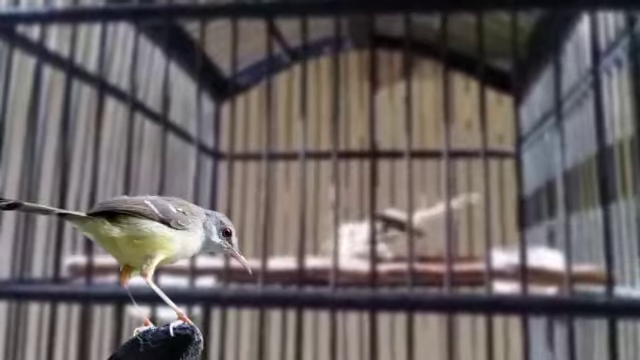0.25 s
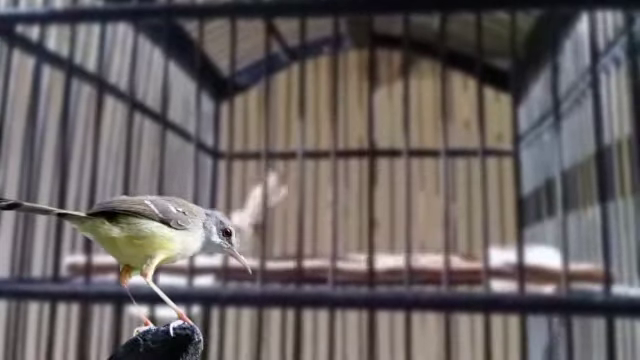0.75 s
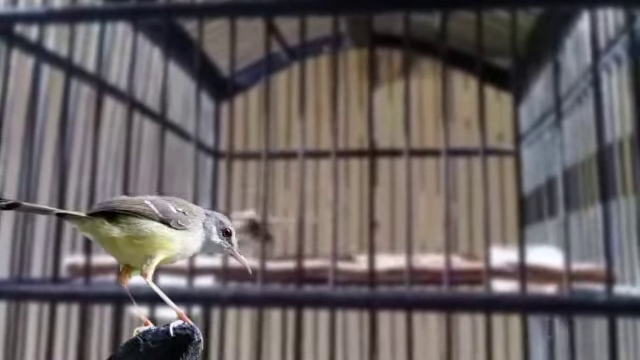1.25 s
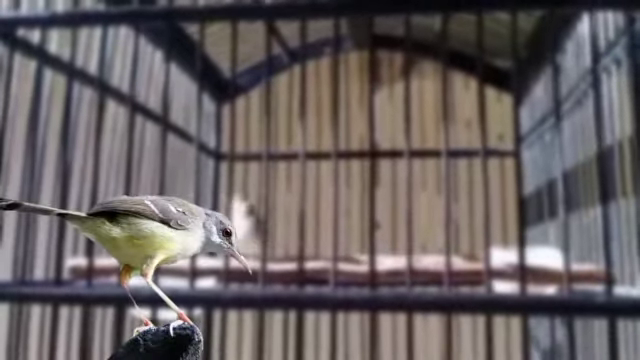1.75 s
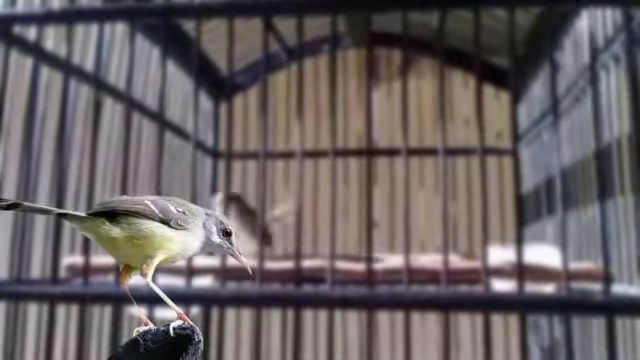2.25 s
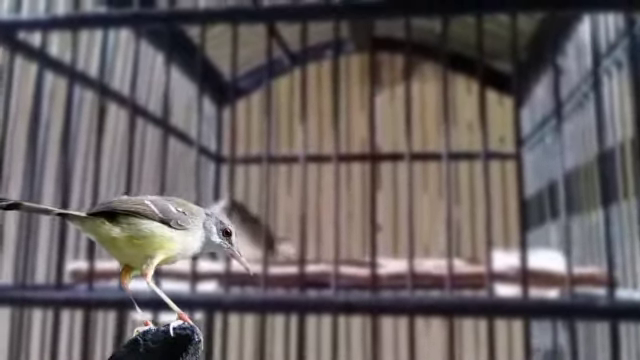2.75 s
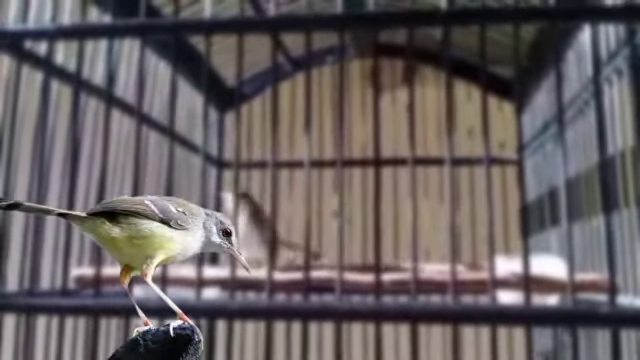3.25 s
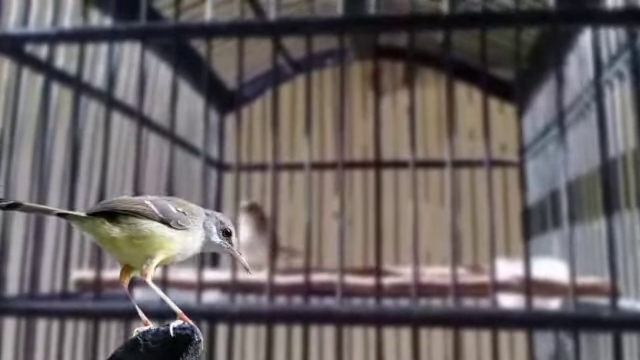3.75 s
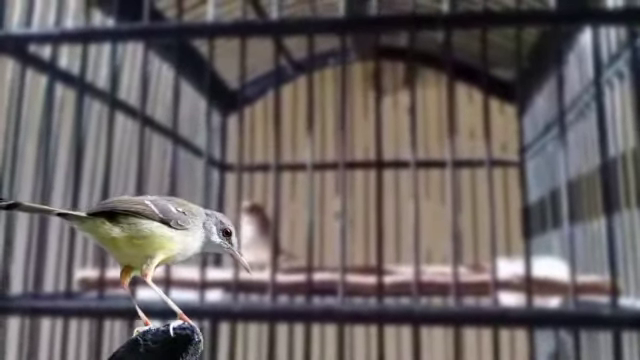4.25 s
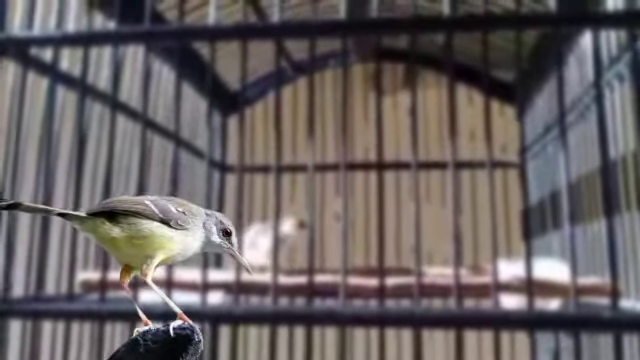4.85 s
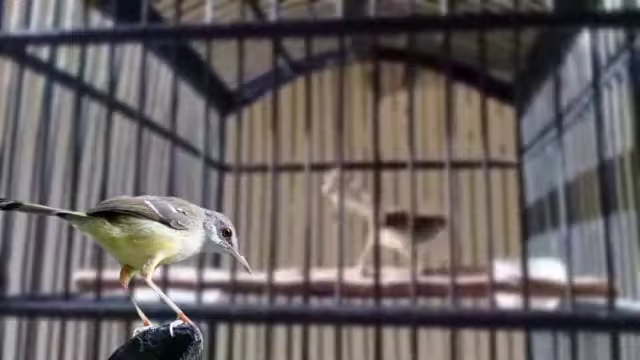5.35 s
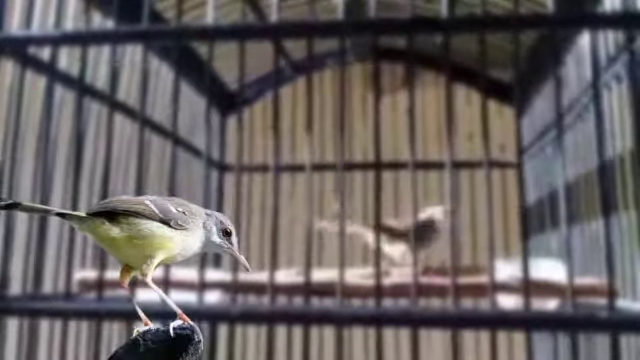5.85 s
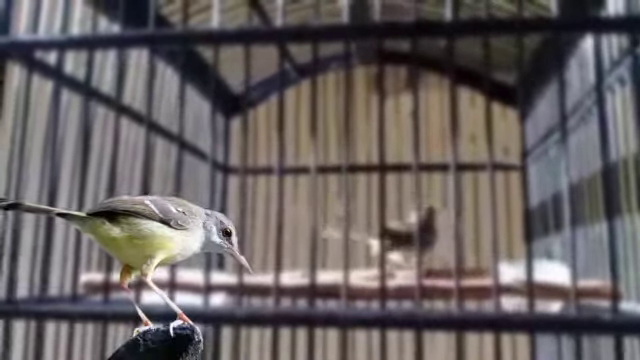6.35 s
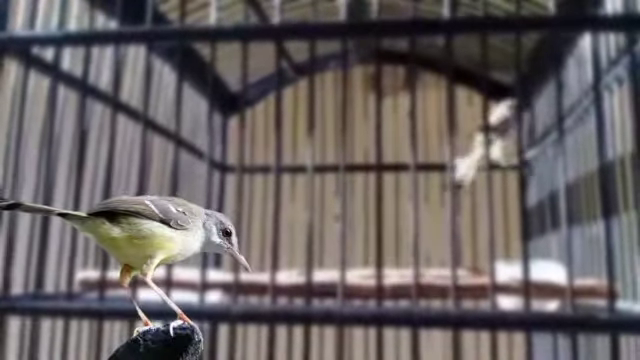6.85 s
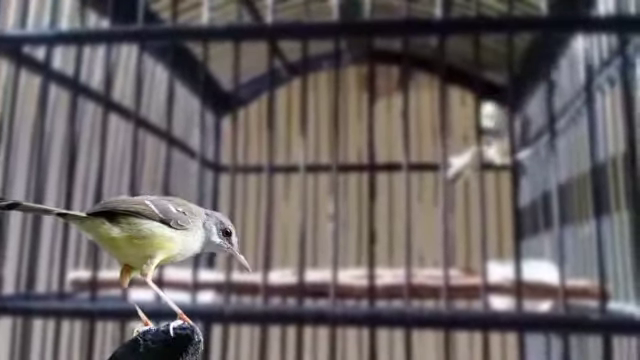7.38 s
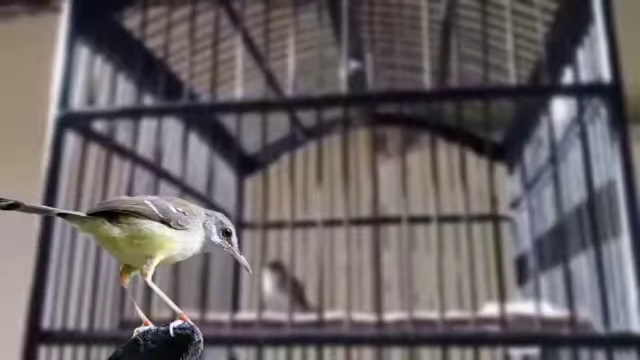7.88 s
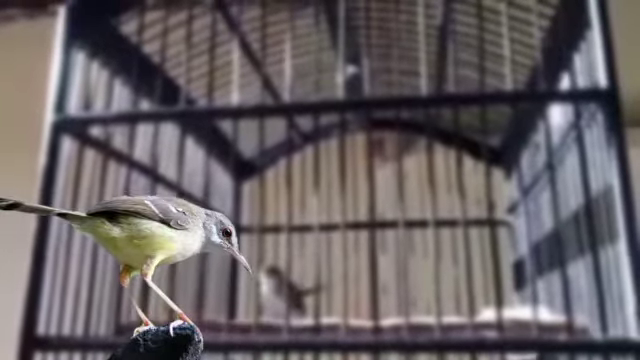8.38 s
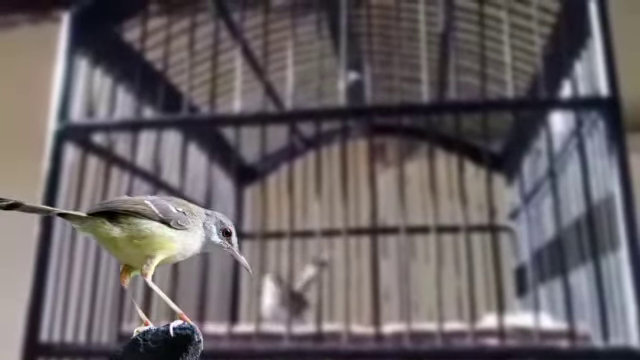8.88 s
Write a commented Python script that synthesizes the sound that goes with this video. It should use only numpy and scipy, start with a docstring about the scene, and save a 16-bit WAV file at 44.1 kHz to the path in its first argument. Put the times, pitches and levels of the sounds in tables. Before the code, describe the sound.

Inside a small room, fainter birds whistle before a nearby caged bird gives a scratchy two-toned call. It chirps regularly, each high note rising and dropping quickly after a tiny tick, until a sharp cage rap and a blink of silence. Sliding, buzzing calls come next, then soft thumps, a few chirps and a last knock. Loud notes flatten slightly over low rumble and hiss.

```python
"""A bar-winged prinia sings in a cage in a small room, close enough to overload the microphone.
Fainter birds whistle from the start; a harsh two-voiced call comes first, a glide broken by chaotic rasps.
Ticks (steep sweeps) lead a run of arched chirps; a hard cage knock (crack and ringing modes) ends it.
The sound drops out briefly; falling slurs and buzzes (period-doubled tones) follow, then knocks.
More chirps and a last knock close it, over rumble, wash, hiss (shaped noise) and a low drone."""
import sys
import numpy as np
from scipy import signal
from scipy.fft import rfft, irfft
from scipy.io import wavfile

SR = 44100
rng = np.random.default_rng(int(sys.argv[2]) if len(sys.argv) > 2 else 0)


def transcribe(u):
    """Save the signal u as a 16-bit wav file named by the first command-line argument.

    u: samples, shape (n,) or (channels, n), limited to [-1, 1]; the rate is SR.
    q: integer samples, one column per channel.
    """
    v = np.clip(np.atleast_2d(u).T, -1, 1)
    q = np.round(v * 32767).astype(np.int16)
    wavfile.write(sys.argv[1], SR, q)


N = 402191
TIME = np.arange(N) / SR

# no note is quite steady: spread as a share of pitch, spread of level, rate
WAVER, WAVER_DB, WAVER_HZ = 0.0081, 2.48, 53.2


def sing(notes, partials, jitter, shimmer_db, flutter_hz, edge_s):
    """Frequency modulation: phase integrates a trembling pitch; partials lock to quarters of that phase."""
    out = np.zeros(N)
    effort = flutter(WAVER_HZ)  # moves pitch and level together
    bend = 1 + jitter * flutter(flutter_hz) + WAVER * effort
    tremble = from_db(shimmer_db * flutter(flutter_hz) + WAVER_DB * effort)
    for note in notes:
        s, hz, db = np.transpose(sorted(note))
        at = slice(*np.searchsorted(TIME, [s[0] - edge_s, s[-1] + edge_s]))
        t = TIME[at]
        phase = 2 * np.pi * np.cumsum(np.interp(t, s, hz) * bend[at]) / SR
        inside = np.minimum(t - s[0], s[-1] - t)
        gate = np.sin(np.pi / 2 * np.clip(1 + inside / edge_s, 0, 1)) ** 2
        tone = sum(from_db(level) * np.sin(round(4 * k) / 4 * phase) for k, level in partials)
        out[at] += gate * from_db(np.interp(t, s, db)) * tremble[at] * tone
    return out


def glide(start_s, length_s, pitches_hz, levels_db, count=25):
    """Polynomial pitch contour through evenly spaced values, piecewise-linear level: rows (t/s, f/Hz, level/dB)."""
    u = np.linspace(0, 1, count)
    pitch_at = np.linspace(0, 1, len(pitches_hz))
    bend = np.polyfit(pitch_at, pitches_hz, len(pitches_hz) - 1)
    db = np.interp(u, np.linspace(0, 1, len(levels_db)), levels_db)
    return list(zip(start_s + length_s * u, np.polyval(bend, u), db))


LEAD_IN_S, LEAD_IN_HZ, LEAD_IN_SWELL_DB = .021, 1980, 4  # slides in softly from below, swelling
ATTACK_S = .006  # then rises to full strength
KNEE_SHARE, KNEE_DB = .4, -2.5  # the climb changes pace at this share of the rise
CREST_SHARE, CREST_SAG_HZ = 0.25, 167.4  # the top is rounded
FOOT_HZ, FOOT_DB = 3366, -4.5  # where the loud fall ends
RELEASE_S, RELEASE_HZ, RELEASE_DB = .016, 2827, -25.5


def arch(s, rise_s, fall_s, onset_hz, knee_hz, top_hz, lead_db, rise_db, crest_db, fall_db):
    """Piecewise-linear chirp: soft lead-in, burst, climb past a knee, rounded crest, fall and release."""
    top_s, crest_hz = s + rise_s, top_hz - CREST_SAG_HZ
    foot_s = top_s + fall_s
    attack_hz = np.interp(ATTACK_S, [0, LEAD_IN_S], [onset_hz, LEAD_IN_HZ])
    lead_in = [(s - LEAD_IN_S, LEAD_IN_HZ, lead_db - LEAD_IN_SWELL_DB / 2),
               (s - ATTACK_S, attack_hz, lead_db + LEAD_IN_SWELL_DB / 2)]
    climb = [(s, onset_hz, rise_db), (s + KNEE_SHARE * rise_s, knee_hz, rise_db + KNEE_DB)]
    crest = [(top_s - CREST_SHARE * rise_s, crest_hz, crest_db),
             (top_s, top_hz, crest_db),
             (top_s + CREST_SHARE * fall_s, crest_hz, fall_db)]
    drop = [(foot_s, FOOT_HZ, fall_db + FOOT_DB), (foot_s + RELEASE_S, RELEASE_HZ, RELEASE_DB)]
    return lead_in + climb + crest + drop


SLUR_ATTACK_S, SLUR_ATTACK_DB, SLUR_OVERSHOOT_HZ = .013, -20.5, 251.3


def slur(row):
    """Downward frequency sweep, swelling in from just above its first pitch."""
    s, length, *pitches, first_db, middle_db, last_db = row
    swell = (s - SLUR_ATTACK_S, pitches[0] + SLUR_OVERSHOOT_HZ, first_db + SLUR_ATTACK_DB)
    return [swell] + glide(s, length, pitches, (first_db, middle_db, last_db))


def trails(notes):
    """Falling pitch of a relaxing syrinx: each note trails off far down in pitch."""
    ends = [max(note)[0] for note in notes]
    falls = [[(s - .012, 2900, -24), (s + 0.0014, 2200, -28), (s + 0.0199, 1500, -38)] for s in ends]
    return sing(falls, [(1, 0.017)], jitter=0.06, shimmer_db=0.5, flutter_hz=400, edge_s=.004)


# Levels of notes are relative throughout.
# arched chirps: onset t/s, rise t/s, fall t/s, onset f/Hz, knee f/Hz, top f/Hz,
# lead-in level/dB, rise level/dB, crest level/dB, fall level/dB
ARCHES = [(1.267, .048, .022, 3050, 4030, 4695, -12.5, 0, -12.5, -5),
          (1.593, .029, 0.028, 3440, 3710, 4660, -16, 0, -12, -1),
          (1.873, 0.057, 0.027, 3257, 3890, 4510, -23.5, 0.5, -8.5, -1),
          (2.165, 0.051, 0.026, 3180, 3834, 4786, -27, 0, -6, -7),
          (2.451, 0.043, 0.031, 3330, 3840, 4760, -24, 0, -7.5, -2.5),
          (2.757, .030, 0.018, 3333, 3840, 4426, -25.5, -4.5, -4.5, -9),
          (3.015, 0.054, 0.025, 3477, 3826, 4790, -16.5, -0.5, -7, -9),
          (3.306, 0.042, .022, 3150, 3560, 4650, -26, -3.5, -1.5, -10),
          (3.570, 0.041, .033, 3350, 3700, 4860, -20.5, -4, 1, -8),
          (3.846, .040, .020, 3320, 4025, 4630, -17, -1.5, -3.5, -13.5),
          (4.124, .041, 0.019, 3380, 4050, 5090, -17, 0.5, -15, -2),
          (8.092, 0.045, .026, 3194, 3707, 4913, -26, -1, -12.5, -2.5),
          (8.393, 0.041, 0.022, 3120, 3954, 4450, -24.5, -3, -7.5, -6),
          (8.690, 0.046, 0.013, 3310, 3790, 4670, -25, -2, -13.5, -6)]
# falling slurs: start t/s, length t/s, f/Hz at start, each quarter and end (5 columns),
# level/dB at start, middle and end (3 columns)
SLURS = [(4.703, 0.1, 6330, 5510, 5080, 4006, 3150, -7.5, -6.5, -3.5),
         (4.947, 0.12, 6440, 5180, 4490, 4265, 3315, -7, -3.5, -9.5),
         (6.551, .108, 4870, 4350, 4060, 3613, 2965, -5.5, -1.5, -4),
         (6.875, 0.12, 5490, 4505, 4007, 3654, 3160, -5.5, -6.5, -7.5)]
# flicks of the other side of the syrinx: start t/s, length t/s, f/Hz at start, middle and end, level/dB
FLICKS = [(1.307, 0.037, 6400, 5410, 4240, -14.5), (2.14, 0.017, 2670, 3280, 3150, -5),
          (3.05, .035, 4600, 5180, 4460, -17), (3.281, .026, 2700, 3200, 3080, -7),
          (4.163, .020, 5300, 4784, 3670, -0.5), (5.413, 0.02, 2960, 4470, 7300, -11.5),
          (5.427, 0.015, 3004, 4220, 3150, 3), (6.068, 0.013, 5310, 7130, 4700, -12),
          (6.071, 0.0125, 2788, 3490, 2830, -6), (7.506, 0.032, 3450, 4193, 4710, 0),
          (7.522, .028, 4700, 3620, 3300, -7.5), (7.683, 0.0162, 4360, 3900, 2980, -14)]
# nearly pure spectrum: multiple of the pitch [ratio], level/dB
CLEAR_PARTIALS = [(.5, -42), (1, 0), (1.5, -44), (2, -42)]
FLICK_EDGE_DB = -19  # a flick swells from and fades to this, relative to its middle


def clear_notes():
    """Near-sinusoidal phonation: arched chirps, slurs and quick flicks with weak partials."""
    notes = [arch(*row) for row in ARCHES] + [slur(row) for row in SLURS]
    flicks = []
    for s, length, *pitches, db in FLICKS:
        edge_db = db + FLICK_EDGE_DB
        flicks.append(glide(s, length, pitches, (edge_db, db, edge_db)))
    clear = sing(notes + flicks, CLEAR_PARTIALS, jitter=0.0014, shimmer_db=2.5, flutter_hz=362, edge_s=0.0064)
    return from_db(-0.08) * clear + trails(notes)


# buzzy slurs: start t/s, length t/s, strong-line f/Hz at start, each quarter and end (5 columns),
# level/dB at start, middle and end (3 columns)
BUZZES = [(5.44, .095, 4870, 4537, 4000, 3520, 3120, -14.5, -7.5, -15.5),
          (6.067, .152, 4970, 4900, 4375, 4010, 3170, -8, -6, -11.5),
          (7.552, .172, 4953, 4313, 4062, 3647, 3065, -7, -7.5, -16.5)]
# spectrum with half-pitch lines: multiple of the pitch [ratio], level/dB
BUZZY_PARTIALS = [(.5, -12.5), (1, 4.5), (1.5, -26.5), (2, -24.5), (2.5, -31)]


def buzzes():
    """Period doubling: half-pitch partials make every second cycle differ."""
    notes = [slur(row) for row in BUZZES]
    buzzy = sing(notes, BUZZY_PARTIALS, jitter=0.018, shimmer_db=1.0, flutter_hz=523, edge_s=0.0037)
    return from_db(-3.06) * buzzy


# opening harsh call: t/s, f/Hz, level/dB
HARSH_CALL = [(0.572, 4358, -22), (0.584, 4130, -5), (0.602, 4075, -25), (0.62, 4750, -15),
              (0.658, 4829, -21), (0.67, 4310, -8), (0.678, 4370, -13), (0.692, 3535, -16.5),
              (0.75, 3950, -29.5)]
# second side of the syrinx, braiding round it: t/s, f/Hz, level/dB
SECOND_VOICE = [(0.577, 6594, -23), (.598, 3500, -21), (0.614, 3210, -24), (0.631, 3720, -45),
                (0.678, 3230, -19.5), (.755, 2980, -28.5)]
# its spectrum: multiple of the pitch [ratio], level/dB
HARSH_PARTIALS = [(.5, -9.5), (1, 3), (1.5, -25)]
RATTLE_DEPTH = .7


def harsh_call():
    """Biphonation with amplitude modulation: two pitch lines share a rattle wandering about 260 Hz."""
    voices = sing([HARSH_CALL, SECOND_VOICE], HARSH_PARTIALS,
                  jitter=.02, shimmer_db=1.5, flutter_hz=216, edge_s=0.0026)
    rattle_phase = 2 * np.pi * np.cumsum(260 + 60 * flutter(47.3)) / SR
    return from_db(-0.5) * voices * (1 + RATTLE_DEPTH * np.sin(rattle_phase))


# rasps: start t/s, length t/s, level/dB
RASPS = [(0.59, 0.044, -5), (0.625, 0.054, -12), (0.694, 0.041, -13), (5.412, 0.021, -3),
         (6.064, 0.021, -0.5), (6.527, 0.017, -10), (7.517, 0.0282, -5), (7.697, .014, -27),
         (8.634, 0.03, -2.5)]


def rasps():
    """Chaotic phonation: strong fast random pitch and level modulation breaks a falling tone into noise."""
    breaks = [[(s, 4600, db), (s + length, 4000, db - 9)] for s, length, db in RASPS]
    rough = sing(breaks, [(.5, -23), (1, -2), (1.5, -17.0)],
                 jitter=0.121, shimmer_db=7.0, flutter_hz=590, edge_s=.003)
    return from_db(-7.0) * band(rough, 1670, 10200)


# ticks: start t/s, length t/s, level/dB
TICKS = [(0.568, 0.013, -9), (0.923, 0.029, -23), (0.997, 0.016, -22.5), (1.061, 0.03, -20),
         (1.119, 0.021, -20), (1.196, 0.023, -20), (1.221, 0.012, -6), (1.482, 0.013, -22.5),
         (1.532, 0.018, -13), (1.826, 0.0094, -10), (2.116, 0.02, -14), (2.4, 0.015, -10.5),
         (2.707, 0.019, -8.5), (2.952, 0.021, -5.5), (3.245, 0.011, -5), (3.526, 0.014, -1),
         (3.779, 0.0086, -4.5), (4.065, 0.021, -7.5), (8.048, 0.016, -15), (8.334, 0.041, -14),
         (8.634, 0.012, -22), (8.638, 0.008, -8)]


def ticks():
    """Rapid frequency sweep: a steep fall through a band-pass is heard as a tick."""
    sweeps = [[(s, 7000, db + 2.5), (s + length / 2, 5700, db), (s + length, 3700, db)]
              for s, length, db in TICKS]
    tick = sing(sweeps, [(.5, -11.0), (1, -3.5)],
                jitter=0.065, shimmer_db=3.0, flutter_hz=840, edge_s=0.0013)
    return from_db(-6.5) * band(tick, 3090, 5280)


def prinia():
    """Superposition of the syrinx regimes: clear, harsh, period-doubled and chaotic notes, and ticks."""
    return clear_notes() + harsh_call() + buzzes() + rasps() + ticks()


# knocks: t/s, peak level/dB before the room, upper band edge f/Hz
KNOCKS = [(2.03, -45, 3000), (4.4473, -9, 6400), (4.505, -26.5, 453), (4.515, -27.5, 640),
          (7.747, -25, 1500), (7.756, -23, 1510), (9.018, -28, 2930)]
# modes of the frame: f/Hz, relative level/dB, 60 dB decay t/s
CAGE_MODES = [(294, -30, 0.21), (518, -21.5, 0.085), (724, -36.5, 0.26), (1143, -32, .07), (1910, -43, .05),
              (2440, 0.5, 0.12)]


def cage():
    """Modal excitation: a short crack and decaying frame modes; a lower band edge makes a duller knock."""
    t = TIME[:SR // 4]
    ring = sum(from_db(db - 60 * t / t60) * np.sin(2 * np.pi * hz * t) for hz, db, t60 in CAGE_MODES)
    burst = np.sin(2 * np.pi * 700 * t) + 0.87 * rng.standard_normal(len(t))
    crack = from_db(-60 * t / 0.0063) * burst
    out = np.zeros(N + len(t))
    for s, db, bright_hz in KNOCKS:
        knock = band(crack + from_db(-26.5) * ring, 120, bright_hz)
        out[int(s * SR):][:len(t)] += from_db(db) * knock / np.abs(knock).max()
    return out[:N]


# whistles behind: start t/s, length t/s, f/Hz at start, middle and end, first level/dB, last level/dB
WHISTLES = [(.07, 0.11, 5300, 4186, 3820, -35, -29), (0.312, 0.16, 7200, 4770, 3900, -31, -25),
            (0.774, 0.07, 3905, 3726, 3700, -24, -31.5), (2.31, 0.16, 4000, 6360, 6850, -45.5, -23.5),
            (3.398, 0.13, 2100, 2590, 2940, -31.5, -34.5), (3.87, 0.19, 2320, 2365, 2450, -33, -40),
            (4.242, .18, 3020, 3065, 3100, -37, -41.5), (4.51, 0.026, 6620, 6220, 5900, -34, -28.5),
            (4.634, 0.15, 2930, 2920, 2970, -23, -29), (4.635, 0.05, 5200, 4080, 3400, -29.5, -29.5),
            (4.889, 0.077, 7000, 5350, 3200, -46, -22), (4.93, 0.2, 2520, 2255, 2190, -26.5, -40),
            (3.108, 0.15, 3020, 2870, 2770, -41, -40), (5.181, 0.15, 2430, 3900, 4080, -30, -40),
            (5.214, .195, 7100, 6180, 4180, -38.5, -32.5), (5.32, 0.084, 3050, 2800, 2770, -36.5, -26.5),
            (5.50, 0.22, 7150, 6290, 3510, -44, -29), (5.81, .195, 7000, 6070, 3300, -32, -24),
            (6.28, 0.18, 2900, 4690, 5150, -33, -27), (6.97, 0.087, 6850, 6880, 6740, -36, -53),
            (7.111, 0.17, 4200, 6570, 6830, -39.5, -30), (7.32, 0.21, 3300, 3395, 3490, -30.5, -22),
            (7.74, 0.23, 3475, 3376, 3340, -31, -46), (7.97, 0.094, 3500, 4880, 6250, -34.5, -30),
            (8.165, 0.07, 6250, 5970, 6150, -36, -58), (8.261, 0.069, 3900, 5270, 6350, -30.5, -37.5),
            (8.525, 0.087, 4180, 5850, 6200, -29, -43), (8.805, 0.069, 6760, 6300, 5500, -49, -53),
            (8.88, 0.11, 5100, 4100, 3820, -31, -29)]


def whistles():
    """Smooth frequency glides with a second harmonic confined to a narrow bright band."""
    notes = [glide(s, length, pitches, (first_db, last_db))
             for s, length, *pitches, first_db, last_db in WHISTLES]
    whistle = sing(notes, [(1, 0.0)], jitter=.005, shimmer_db=2.5, flutter_hz=288, edge_s=0.012)
    overtone = sing(notes, [(2, -11.5)], jitter=.005, shimmer_db=4.5, flutter_hz=300, edge_s=0.0081)
    return whistle + band(overtone, 7750, 9150)


# trills behind: start t/s, length t/s, pip rate f/Hz, top f/Hz, level/dB
TRILLS = [(2.6, .088, 23.7, 3850, -33), (7.311, .165, 24, 3770, -26.5), (7.77, .175, 18, 3280, -30)]


def trills():
    """Periodic repetition: short upward pips follow one another at a steady rate."""
    pips = []
    for start, length, rate, hz, db in TRILLS:
        for s in np.arange(start, start + length, 1 / rate):
            pips.append([(s, .86 * hz, db - 5), (s + .01, hz, db), (s + .026, hz, db - 5)])
    return sing(pips, [(1, 0.05)], jitter=.005, shimmer_db=1.0, flutter_hz=295, edge_s=0.0036)


# hoarse calls of a distant bird: start t/s, length t/s, centre f/Hz, level/dB
HOARSE = [(0.231, 0.098, 1400, -34), (0.538, 0.063, 1220, -33), (1.08, 0.1, 1350, -34),
          (1.506, 0.076, 1400, -33.5), (2.312, 0.48, 770, -45), (2.621, 0.12, 1430, -37.5),
          (2.795, 0.54, 3220, -37), (2.897, 0.12, 1300, -36), (3.252, 0.14, 1440, -32.5),
          (3.678, 0.09, 1270, -41),  (4.739, 0.063, 1680, -36.5), (5.529, 0.16, 945, -37),
          (7.897, 0.061, 1430, -34.5), (8.739, 0.05, 1500, -33), (9.029, 0.1, 1430, -34.5)]


def hoarse_calls():
    """Band-limited noise: each call is a noise band under a half-sine envelope."""
    out = np.zeros(N)
    for s, length, hz, db in HOARSE:
        at = slice(*np.searchsorted(TIME, [s, s + length]))
        rasp = rms_one(band(rng.standard_normal(SR), hz / 1.14, hz * 1.24))[-len(TIME[at]):]
        out[at] += from_db(db) * np.sin(np.pi * (TIME[at] - s) / length) * rasp
    return out


def other_birds():
    """Superposition of the fainter voices: whistles, trills and hoarse calls."""
    return whistles() + trills() + hoarse_calls()


# near surfaces: delay t/s, level/dB
ECHOES = [(.0021, -42.5), (.0043, -25), (.0074, -11.5), (.0098, -37), (0.0106, -28), (0.0184, -16)]


def room(x, distance_db):
    """Convolution: near echoes beat with gliding tones; scatter and tail strengthen with distance."""
    t = TIME[:int(.7 * SR)]
    response = np.zeros(len(t))
    for t60, db in [(0.11, -12.5), (0.35, -19)]:  # quick scatter, longer tail
        decay = from_db(-60 * t / t60) * np.clip(t / 0.0009, 0, 1)
        tail = band(rng.standard_normal(len(t)), 240, 10400) * decay
        response += from_db(db + distance_db) * tail / np.sqrt(np.sum(tail ** 2))
    for delay, db in ECHOES:
        response[int(delay * SR)] += from_db(db)
    return x + signal.fftconvolve(x, response)[:N]


# drone: t/s, level/dB
DRONE = [(0, -58), (1.3, -55), (1.6, -64), (4.5, -69), (4.65, -57), (5.4, -56), (5.6, -63.5), (9.12, -59)]
DRONE_HZ = 77.8


def drone():
    """Narrow-band noise: a low drone comes and goes."""
    hum = rms_one(band(rng.standard_normal(N), DRONE_HZ - 7, DRONE_HZ + 7))
    return from_db(np.interp(TIME, *np.transpose(DRONE))) * hum


# spectral shape of the surrounding noise: f/Hz, relative level/dB per Hz
AIR_SPECTRUM = [(15, -58), (25, -26), (43, -8.5), (86, -2), (173, 5), (339, -9), (521, -2.5), (1230, -2.5),
                (1650, -1.5), (2830, -6), (3150, -4.5), (3600, -11.5), (4230, -4), (5690, -33.5),
                (8000, -22), (9600, -21.5), (11400, -36.5), (15400, -34)]
# its course before trim: t/s, rumble level/dB, wash level/dB, hiss level/dB
AIR_LEVELS = [(0.0, -55, -42.5, -63.5), (0.61, -50, -39, -57.5), (1.14, -49.5, -39, -53),
              (1.57, -55, -38.5, -57), (3.3, -61.5, -45.5, -62), (4.01, -55.5, -43.5, -54),
              (4.21, -52, -43.5, -60.5), (4.65, -57.5, -44, -56), (5.36, -63.5, -48, -67),
              (5.61, -59.5, -40.5, -65), (6.45, -58.5, -43, -56), (7.11, -58.5, -46.5, -59),
              (7.34, -54, -41.5, -63.5), (8.41, -57.5, -45, -63.5), (8.92, -54, -43, -65.5),
              (9.12, -52.5, -43, -59)]
# trim of rumble, wash and hiss: level/dB
AIR_TRIM_DB = (1, 1, 8.5)
# edges of the three bands: f/Hz
AIR_EDGES_HZ = (15, 250, 5600, 16000)


def air():
    """Spectral shaping of white noise: rumble, wash and hiss each swell on their own, beside a drone."""
    hz, db = np.transpose(AIR_SPECTRUM)
    bins = np.maximum(np.arange(N // 2 + 1) * SR / N, 1)
    spectrum = rfft(rng.standard_normal(N)) * from_db(np.interp(np.log(bins), np.log(hz), db))
    s, *levels = np.transpose(AIR_LEVELS)
    out = drone()
    for level_db, trim_db, low_hz, high_hz in zip(levels, AIR_TRIM_DB, AIR_EDGES_HZ, AIR_EDGES_HZ[1:]):
        noise = rms_one(irfft(spectrum * ((bins >= low_hz) & (bins < high_hz)), N))
        swell_db = np.interp(TIME, s, level_db) + trim_db + 1.5 * flutter(22)
        out = out + from_db(swell_db) * noise
    return out


def from_db(db):
    """Decibel law: level to amplitude ratio."""
    return 10 ** (np.asarray(db) / 20)


def rms_one(x):
    """Normalisation to unit effective value."""
    return x / np.sqrt(np.mean(x ** 2) + 1e-20)


def band(x, low_hz, high_hz):
    """Band-pass filtering with a Butterworth response."""
    edges = [low_hz, min(high_hz, .45 * SR)]
    return signal.sosfilt(signal.butter(2, edges, "band", fs=SR, output="sos"), x)


def flutter(rate_hz):
    """Low-passed white noise: smooth chance of spread 1."""
    low_pass = signal.butter(2, rate_hz, fs=SR, output="sos")
    return rms_one(signal.sosfilt(low_pass, rng.standard_normal(N)))


def scene():
    """Superposition: prinia and cage near, other birds in a stronger reverberation, noise around them."""
    near = room(prinia() + cage(), distance_db=1)
    behind = room(other_birds(), distance_db=5.5)
    return (near + behind + air())[None]


# silent span: start t/s, end t/s
DROPOUT_S = (4.54, 4.632)


def record(dry):
    """Saturation and low-pass filtering: loud peaks flatten, the sound drops out once, the top is cut."""
    ceiling = from_db(-0.8)
    clipped = dry / (1 + np.abs(dry / ceiling) ** 12) ** (1 / 12)
    live = (TIME < DROPOUT_S[0]) | (TIME > DROPOUT_S[1])
    top_cut = signal.cheby2(14, 50, 16000, fs=SR, output="sos")  # 50 dB down from 16 kHz
    return signal.sosfilt(top_cut, clipped * live)


dry = scene()
out = record(dry)
transcribe(out)
```